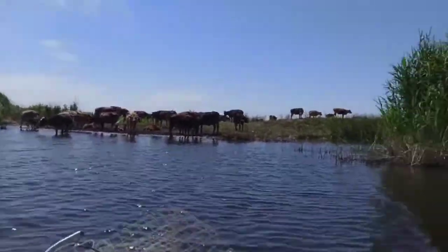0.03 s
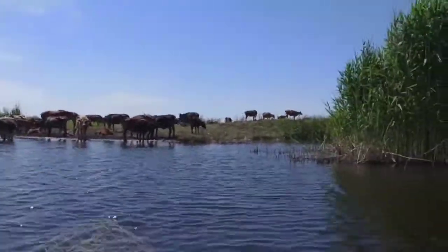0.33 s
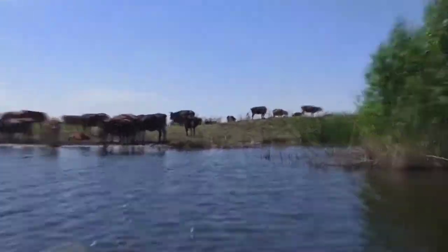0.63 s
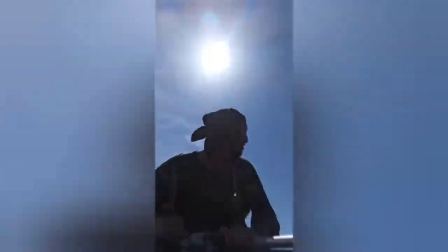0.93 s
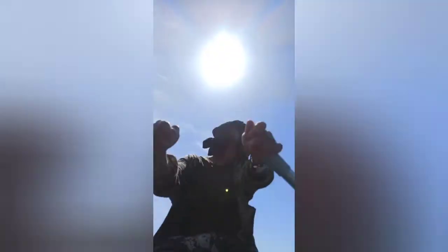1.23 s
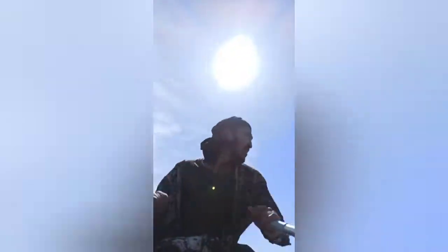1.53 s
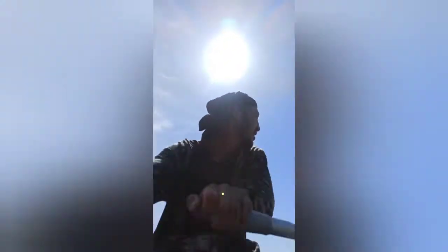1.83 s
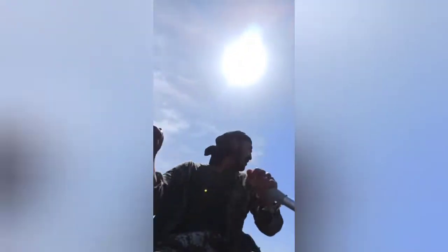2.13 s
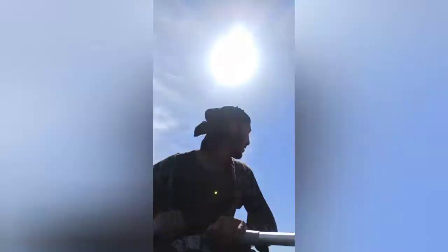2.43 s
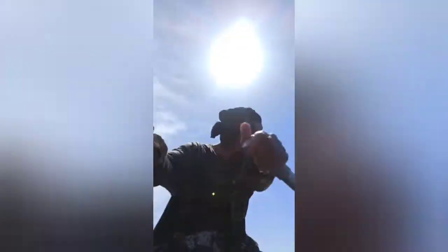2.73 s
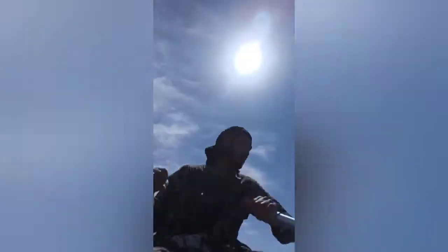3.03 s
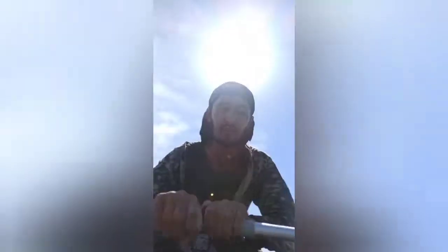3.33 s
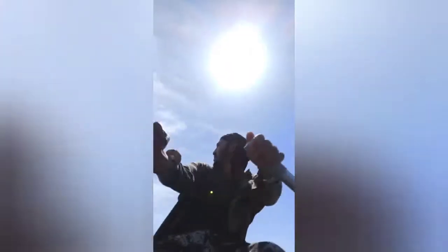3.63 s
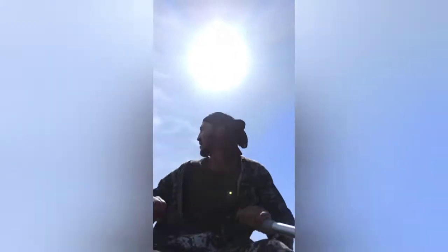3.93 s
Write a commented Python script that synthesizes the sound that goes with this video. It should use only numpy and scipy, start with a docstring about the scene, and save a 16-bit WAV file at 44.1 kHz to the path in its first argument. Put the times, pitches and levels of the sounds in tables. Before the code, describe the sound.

Oars row a small boat over open water, with wind thumping on the microphone. At first reeds and ripples hiss softly in the breeze, sinking away by 0.7 seconds. The close rowing fades up around 1 second, and an oarlock ticks and gives one raspy squeak at about 1.2. Quick strokes continue until 4 seconds, with splashing blades, plopping bubbles, swells of spray and low slaps against the hull.

```python
"""Oars pull a small boat over open water, the water sounds following thick and fast: blades splash, bubbles
ring, water slaps the hull and a wash of spray swells with each stroke. Once, an oar rubs in its lock with a
raspy squeak. The scene opens on reeds and ripples hissing in the breeze; they sink away before the close rowing
fades up. Throughout, wind eddies thump on the left and right ports of the microphone."""
import sys
import numpy as np
from scipy import signal
from scipy.fft import rfft, irfft
from scipy.io import wavfile
from scipy.ndimage import uniform_filter1d

SR = 44100
rng = np.random.default_rng(int(sys.argv[2]) if len(sys.argv) > 2 else 0)


def pcm_store(signal):
    """Save signal as 16-bit PCM."""
    levels = np.round(np.clip(np.atleast_2d(signal), -1, 1) * 32767)
    wavfile.write(sys.argv[1], SR, levels.astype(np.int16).T)


N = 176400
T = np.arange(N) / SR


def undb(db):
    """Decibels to gain."""
    return 10 ** (np.asarray(db) / 20)


def unit(x):
    """Scale to rms 1."""
    return x / np.sqrt(np.mean(x ** 2) + 1e-18)


def curve(table, column):
    """Automation lane: one column of a table, joined by straight lines in time."""
    rows = np.array(table)
    return np.interp(T, rows[:, 0], rows[:, column])


def pan(db):
    """Constant-power pan; db is left minus right."""
    gains = undb(np.array([np.atleast_1d(db), -np.atleast_1d(db)]) / 2)
    return gains / np.sqrt(np.mean(gains ** 2, axis=0))


def eq(x, points, tilt_db=0):
    """Shape a sound with an EQ curve and a tilt per octave; rms 1."""
    hz, db = np.array(points, float).T
    octave = np.log2(np.maximum(np.fft.rfftfreq(x.shape[-1], 1 / SR), 1))
    gain = undb(np.interp(octave, np.log2(hz), db) + tilt_db * octave)
    return unit(irfft(rfft(x) * gain, x.shape[-1]))


def butter(x, hz, kind, order=2):
    """Low-pass or high-pass filter."""
    return signal.sosfilt(signal.butter(order, hz, kind, fs=SR, output="sos"), x)


def wobble(rate):
    """Smooth random modulator that turns about rate times a second; rms 1."""
    hold = int(SR / rate)
    steps = np.repeat(rng.standard_normal(N // hold + 1), hold)
    return unit(uniform_filter1d(steps, hold)[:N])


def patter(per_s, scatter_db):
    """Stereo texture of tiny impacts of uneven size; rms 1."""
    hits = (rng.random((2, N)) < per_s / SR) * rng.standard_normal((2, N))
    return unit(hits * undb(scatter_db * np.minimum(rng.exponential(size=(2, N)), 4)))


def narrow_noise(width):
    """Noise that reaches both ports almost alike."""
    return rng.standard_normal(N) + width * rng.standard_normal((2, N))


def bubble(age, hz, cycles):
    """A bubble rings, rising in pitch as it dies away."""
    life = np.maximum(age, 0) * hz / cycles
    return np.sin(2 * np.pi * cycles * life * (1 + 0.029 * life)) * np.exp(-2 * life)


def bubbling(per_s, hz, octaves):
    """Bubbles of many sizes at random moments; rms 1."""
    out, age = np.zeros(N + SR // 30), np.arange(SR // 30) / SR
    for when, pitch, size in rng.random((int(per_s * N / SR), 3)):
        i = int(when * N)
        ring = bubble(age, hz * 2 ** (octaves * (pitch - .5)), cycles=5.5)
        out[i:i + len(age)] += undb(20 * size) * ring
    return unit(out[:N])


# Airy hiss of the reeds: f/Hz, level/dB
REEDS_EQ = [(100, 9.5), (400, 8), (800, 2.5), (1100, 1.5), (1700, 1), (3000, 1.5), (4500, 2.5),
            (5400, -3.5), (6600, 6.5), (7600, -1), (8400, -11), (9500, -57.5), (11000, -40), (12000, -13),
            (15500, -17.5), (20000, -33)]


def reeds():
    """Breeze hisses through the reeds while small ripples trickle."""
    hiss = eq(patter(12000, 1.2), REEDS_EQ) * undb(-45 + .5 * wobble(19)) * pan(-2.5)
    trickle = undb(-58.5) * bubbling(per_s=66, hz=1306, octaves=1.9)
    return hiss + trickle


# Fuller wind bed by the reeds: f/Hz, level/dB
REEDS_RUMBLE_EQ = [(20, -30.5), (45, -18.5), (80, 6), (130, 4.5), (210, -1.5), (330, -14.5), (450, -23),
                   (650, -37), (1500, -52), (16000, -86.5)]
# Wind bed at the oars: f/Hz, level/dB
OARS_RUMBLE_EQ = [(20, -30.5), (45, -39.5), (85, 7), (130, -0.5), (200, -7), (320, -12.5), (600, -51),
                  (1500, -63), (16000, -78.5)]


def wind_rumble(points, left_db, right_db):
    """Restless low turbulence, unrelated on the two ports."""
    flutter = undb(4 * np.array([wobble(30), wobble(22)]))
    turbulence = eq(rng.standard_normal((2, N)), points)
    return unit(turbulence * flutter) * undb([[left_db], [right_db]])


# Wind thumps on the microphone: t/s, length/s, level/dB, low-pass f/Hz, port (0 left, 1 right)
EDDIES = [(0.065, 0.012, -22, 190, 1), (0.114, 0.013, -22.5, 173, 1), (0.191, 0.006, -15.5, 240, 1),
          (0.205, 0.011, -16, 252, 1), (0.263, 0.045, -20, 219, 1), (0.306, 0.009, -19.5, 156.4, 1),
          (0.335, 0.086, -25, 164, 1), (0.361, 0.064, -20.5, 198, 1), (0.724, 0.01, -42, 208, 1),
          (0.888, 0.016, -40, 230, 0), (1.01, 0.022, -38, 240, 0), (1.217, 0.023, -15, 263, 0),
          (1.239, 0.029, -26, 700, 1), (1.245, 0.018, -19, 394, 0), (1.285, 0.063, -26, 176, 1),
          (1.401, 0.015, -14.5, 320, 0), (1.426, 0.011, -17, 220, 0), (1.481, 0.0064, -6.5, 288, 0),
          (1.501, 0.02, -17, 187, 0), (1.567, 0.01, -18.5, 270, 1), (1.606, 0.017, -15.5, 353, 0),
          (1.692, 0.041, -19.5, 228, 0), (1.814, 0.016, -19.5, 280, 1), (1.988, 0.0057, -21.5, 380, 1),
          (2.003, 0.018, -12, 264, 0), (2.065, 0.019, -19, 200, 0), (2.098, 0.0062, -7.5, 330, 0),
          (2.104, 0.018, -21, 282, 1), (2.145, 0.0085, -18, 290, 1), (2.171, 0.0093, -13, 358, 0),
          (2.184, 0.0042, -9, 417, 0), (2.208, 0.007, -15, 406, 0), (2.22, 0.015, -16.5, 447, 0),
          (2.236, 0.005, -14.5, 328, 0), (2.258, 0.026, -20.5, 297, 0), (2.288, 0.0083, -18, 300, 1),
          (2.289, 0.006, -19.5, 400, 0), (2.302, 0.007, -16.5, 239, 0), (2.312, 0.0047, -19, 416, 0),
          (2.392, 0.0089, -15.5, 280, 0), (2.451, 0.04, -24.5, 290, 0), (2.483, 0.016, -18.5, 242, 0),
          (2.518, 0.012, -11, 362, 0), (2.584, 0.012, -12.5, 165, 0), (2.612, 0.0061, -13, 232, 0),
          (2.633, 0.0093, -15.5, 260, 1), (2.68, 0.021, -13, 262, 0), (2.702, 0.007, -11.5, 198, 0),
          (2.697, 0.012, -16.5, 214, 1), (2.735, 0.011, -15, 226, 0), (2.92, 0.046, -20, 176, 0),
          (3.055, 0.017, -17, 280, 0), (3.063, 0.0059, -13.5, 280, 0), (3.106, 0.005, -12.5, 308, 0),
          (3.118, 0.007, -10.5, 218, 0), (3.141, 0.0058, -11.5, 455, 0), (3.158, 0.0067, -17, 240, 1),
          (3.221, 0.011, -15.5, 426, 0), (3.237, 0.0074, -9.5, 414, 0), (3.252, 0.014, -13, 236, 0),
          (3.326, 0.0051, -10.5, 158, 0), (3.333, 0.012, -19, 180, 1), (3.387, 0.0078, -15, 177, 0),
          (3.426, 0.021, -15.5, 242, 0), (3.428, 0.0069, -9, 292, 1), (3.467, 0.0097, -15, 255, 0),
          (3.481, 0.016, -20, 214, 1), (3.499, 0.0077, -16.5, 225, 0), (3.557, 0.015, -13, 258, 0),
          (3.655, 0.0068, -9, 350, 0), (3.747, 0.017, -23, 170, 0), (3.836, 0.0042, -8, 235, 0),
          (3.859, 0.0069, -13, 190, 0), (3.922, 0.021, -17, 208, 0), (3.995, 0.014, -16, 211, 0)]


def wind_thumps():
    """Each eddy hits one port with a pressure kick inside a short burst of turbulence."""
    count, lead_s = 8192, 0.00304
    out = np.zeros((2, N + count))
    t = (np.arange(count) - count // 2) / SR + lead_s
    kick = unit(np.exp(-np.abs(t) * SR))
    for at, length, db, hz, port in EDDIES:
        burst = unit(rng.standard_normal(count) * np.exp(-np.abs(t / (0.64 * length)) ** 3.4))
        punch = 0.65 * min(0.012 / length, 3)  # shorter eddies kick harder
        dull = butter(burst + punch * kick, hz, "low")
        thump = butter(butter(dull, 1.83 * hz, "low"), 79.4, "high", order=4)
        i = int(at * SR)
        out[port, i:i + count] += thump * undb(db + 2.5) * np.sqrt(length * SR / np.sum(thump ** 2))
    return out[:, count // 2:count // 2 + N]


# Fizzy runs of bubbles: centre t/s, half-length/s, level/dB, f/Hz
CLOUDS = [(0.127, 0.026, -45.5, 1750), (1.824, .012, -37, 1590), (1.96, .018, -32.5, 1400),
          (2.684, .012, -33, 1900), (2.867, 0.016, -38.5, 2210), (3.586, .012, -36.5, 1430)]


def bubble_clouds(per_s=600):
    """Water laps or closes over a blade and frees a short run of ringing bubbles."""
    out, age = np.zeros((2, N + SR)), np.arange(SR // 25) / SR
    for at, half_length, db, hz in CLOUDS:
        count = int(per_s * half_length)
        for k, (when, pitch, size, side) in enumerate(rng.random((count, 4))):
            i = int((at + half_length * (2 * (k + when) / count - 1)) * SR)
            ring = bubble(age, hz * 2 ** (pitch - .5), cycles=12.2)
            out[:, i:i + len(age)] += ring * undb(db + 3.6 * size) * pan(10 * (side - .5))
    return out[:, :N]


# Splashes off the blades: t/s, length/s, level/dB, tilt/(dB per octave), pan/dB
BLADE_SPLASHES = [(0.132, 0.026, -46.5, -4, -7), (1.139, 0.01, -32.5, -0.5, 6), (1.192, 0.013, -31, -9, 1),
                  (1.493, 0.013, -37.5, -6, 6), (1.827, 0.0093, -36.5, -5, 4), (1.887, 0.0071, -28, 3, 22),
                  (1.959, 0.019, -29.5, -9, 5), (2.105, 0.004, -34, -8.5, -7), (2.635, 0.0053, -29, -2, 5),
                  (2.677, 0.0037, -21.5, -10, 4), (2.701, 0.0047, -33.5, 0, 1), (2.755, 0.013, -33, -7, -2),
                  (3.472, 0.0023, -26, -1, 3), (3.538, .008, -28.5, -10, 2), (3.583, 0.008, -26, -10, -9),
                  (3.684, 0.0044, -39, -2, -1), (3.725, 0.006, -36.5, -6, 2), (3.914, 0.007, -31, -9.5, 3)]
# Bright spatter of a splash: f/Hz, level/dB
SPLASH_EQ = [(200, -70.5), (700, -9), (1500, -3), (4300, 4), (5400, -4.5), (7000, 9), (8800, -36.5),
             (15000, -34), (20000, -44)]


def splashes():
    """Each splash is a shower of drops that starts sharply and thins out."""
    out, showers, count = np.zeros((2, N)), patter(6000, 2.5), 8192
    lead, attack, decay = 0.95, 0.41, 2  # in splash lengths
    for at, length, db, tilt_db, pan_db in BLADE_SPLASHES:
        start = max(int(at * SR) - count // 2, 0)
        span = slice(start, start + count)
        age = (T[span] - at) / length + lead
        envelope = np.clip(age / attack, 0, 1) * np.exp(-np.maximum(age - attack, 0) / decay)
        out[:, span] += eq(showers[:, span], SPLASH_EQ, tilt_db) * envelope * undb(db) * pan(pan_db)
    return out


def drops(per_splash=7, centre_hz=1660, scatter_s=0.011):
    """A few drops plink back into the water with each splash."""
    out, age = np.zeros((2, N + SR)), np.arange(SR // 20) / SR
    for at, _, db, _, pan_db in BLADE_SPLASHES:
        for when, pitch, size, side in rng.random((per_splash, 4)):
            i = int((at + when * scatter_s) * SR)
            ring = bubble(age, centre_hz * 2 ** (1.2 * (pitch - .5)), cycles=12.3)
            out[:, i:i + len(age)] += ring * undb(db - 9.5 + 3.1 * size) * pan(pan_db + 10 * (side - .5))
    return out[:, :N]


# Spot plops of water: t/s, f/Hz, level/dB
WATER_PLOPS = [(.225, 600, -38), (.455, 546, -40.5), (0.634, 980, -51), (1.908, 1150, -26.5),
               (2.838, 695, -26), (2.858, 2150, -32), (2.743, 2350, -31), (2.866, 299, -20.5),
               (3.766, 1070, -27)]


def plops():
    """Lone bubbles ring out in the centre."""
    return sum(undb(db) * bubble(T - at, hz, cycles=11) for at, hz, db in WATER_PLOPS)


# Swell of the strokes: t/s, churn level/dB, spray level/dB, spray pan/dB
STROKES = [(1.27, -41, -51.5, -20), (1.31, -42, -53.5, -9), (1.44, -43.5, -49.5, 9), (1.52, -41, -52, -3.5),
           (1.66, -41, -50, 4.5), (1.99, -38.5, -45, 4), (2.01, -43, -52, 7), (2.33, -45, -57.5, -6.5),
           (2.65, -38, -45.5, 5.5), (2.91, -45, -51.5, 6.5), (3.26, -43, -56, -4), (3.36, -44, -45.5, 3.5),
           (3.54, -40.5, -52, 4), (3.59, -40, -52.5, -7), (3.63, -45, -57.5, 1), (3.75, -42.5, -50, 4.5),
           (3.96, -40, -53.5, 7), (4.0, -40, -49, 1)]
# Midrange body of churned water: f/Hz, level/dB
CHURN_EQ = [(300, 1), (900, 11.5), (1300, 5.5), (2000, 5), (3000, -2), (4500, -6), (5400, -6.5),
            (8000, -69), (16000, -73)]
# Sizzle of fine spray: f/Hz, level/dB
SPRAY_EQ = [(1500, -15), (3000, 2), (4500, 6), (5100, -10.5), (5900, 0), (6500, 8), (7500, 4.5), (8300, -5),
            (9300, -53), (11000, -38), (12000, -10), (15500, -10.5), (20000, -23.5)]


def wash():
    """Churned water and fine spray swell with each stroke."""
    pan_db = np.where(T < STROKES[0][0], 6, curve(STROKES, 3))
    churn = eq(patter(5000, 2.05), CHURN_EQ) * undb(curve(STROKES, 1) + 2 + 1.05 * wobble(45))
    spray = eq(patter(9000, 1.7), SPRAY_EQ) * undb(curve(STROKES, 2) + 6 + 2 * wobble(45))
    return churn * pan(0.95 * pan_db - 5) + spray * pan(pan_db)


# Dark gurgle along the hull: f/Hz, level/dB
GURGLE_EQ = [(30, -29.5), (90, 0.5), (190, 2), (320, -6.5), (600, -9), (850, -15.5), (1300, -42),
             (3000, -43), (16000, -99)]


def gurgle():
    """Water gurgles along the hull, riding the churn of the oars, over a steady bed of bubbles."""
    churn_db = curve(STROKES, 1)
    stir = undb(0.54 * (churn_db - churn_db.mean()) + 3.5 * wobble(35))
    body = unit(eq(narrow_noise(0.4), GURGLE_EQ) * stir)
    return undb(-28.5) * body + undb(-49) * bubbling(per_s=93, hz=779, octaves=2.5)


# Slaps on the hull: t/s, level/dB
HULL_SLAPS = [(1.143, -21.5), (1.242, -20.5), (1.433, -24.5), (1.61, -19), (1.681, -26), (1.831, -22.5),
              (1.887, -20), (1.961, -20), (2.104, -24.5), (2.309, -25), (2.4, -25.5), (2.534, -24.5),
              (2.612, -24), (2.735, -22), (2.792, -19.5), (2.895, -27), (3.056, -28), (3.152, -29),
              (3.207, -25), (3.426, -28), (3.494, -24.5), (3.591, -20.5), (3.666, -29.5), (3.992, -22)]
# Hollow thud of a slap: f/Hz, level/dB
SLAP_EQ = [(25, -43), (60, -17.5), (170, 13.5), (350, -0.5), (650, 5), (900, -3), (1300, -18), (2500, -18),
           (6000, -54), (16000, -80.5)]


def hull_slaps(attack_s=0.012, release_s=0.022):
    """Water hits the hull in soft-edged, low thuds."""
    force = np.zeros(N)
    for at, db in HULL_SLAPS:
        width = np.where(T < at, attack_s, release_s)
        force += undb(db - 3.5) * np.exp(-((T - at) / width) ** 2)
    return force * eq(narrow_noise(0.32), SLAP_EQ)


# Ticks of the oarlock: t/s, level/dB
LOCK_TICKS = [(1.167, -30), (1.182, -31), (1.247, -43), (1.883, -39)]
# Crisp click of a tick: f/Hz, level/dB
TICK_EQ = [(500, -22), (2000, -5), (4500, 0), (7000, 0), (8500, -5), (10500, -32), (12500, -12),
           (15000, -3), (20000, -23)]


def oarlock_ticks(decay_s=0.0044):
    """The oar knocks against its lock in short, bright contacts."""
    force = sum(undb(db) * (T >= at) * np.exp(-np.abs(T - at) / decay_s) for at, db in LOCK_TICKS)
    return force * eq(rng.standard_normal((2, N)), TICK_EQ) * pan(-4)


def stick_slip(track, partials, jitter, ramp_s=0.004):
    """A rubbing contact sings on an unsteady pitch, each harmonic fluttering in level."""
    hz = curve(track, 1) * (1 + jitter * wobble(1100))
    phase = 2 * np.pi * np.cumsum(hz) / SR
    gate = np.clip(np.minimum(T - track[0][0], track[-1][0] - T) / ramp_s, 0, 1)
    tone = sum(undb(db + 2 * wobble(250)) * np.sin(k * phase) for k, db in partials)
    return gate * undb(curve(track, 2)) * tone


# The squeak, its thinner tail and a weaker chirp: t/s, f/Hz, level/dB
SQUEAK_LINE = [(1.179, 2147, -36), (1.186, 2167, -26), (1.195, 2184, -22), (1.203, 2165, -26),
               (1.212, 2090, -42)]
TAIL_LINE = [(1.200, 2145, -39), (1.207, 2106, -22.5), (1.213, 2070, -25.5), (1.222, 2085, -31),
             (1.228, 2070, -48)]
CHIRP_LINE = [(1.232, 2970, -48), (1.240, 2980, -37), (1.249, 2960, -37.5), (1.264, 2985, -55)]
# Their timbres: harmonic number, level/dB
SQUEAK_TIMBRE = [(1, -11), (2, 2), (3, -4), (6, -20.5), (7, -23)]
TAIL_TIMBRE = [(1, -10), (2, -14), (3, -1.5), (7, -16)]
CHIRP_TIMBRE = [(1, -2), (2, -2)]
# Dry grit under the squeak: f/Hz, level/dB
RASP_EQ = [(1000, -27), (2300, 4), (3500, -14), (4600, -2), (5500, -28), (7300, 0), (9000, -24),
           (15000, -16), (20000, -35)]


def oarlock_squeak():
    """The oar rubs in its dry lock: a raspy squeak drops to a thinner tone, then chirps again."""
    squeak = stick_slip(SQUEAK_LINE, SQUEAK_TIMBRE, jitter=0.007)
    squeak += stick_slip(TAIL_LINE, TAIL_TIMBRE, jitter=0.007)
    envelope = np.sqrt(np.abs(uniform_filter1d(squeak ** 2, size=1200)))
    rasp = undb(-10.5) * envelope * eq(patter(2300, 1.8), RASP_EQ)
    chirp = stick_slip(CHIRP_LINE, CHIRP_TIMBRE, jitter=0.014)
    return (squeak + rasp + chirp) * pan(5)


# Groan of the turning oar: t/s, f/Hz, level/dB
GROAN_LINE = [(1.208, 612, -23), (1.219, 598, -33), (1.243, 585, -27.5), (1.252, 580, -40),
              (1.266, 595, -64)]
# Its round timbre: harmonic number, level/dB
GROAN_TIMBRE = [(1, 6), (2, -12), (3, -22)]


def oarlock_groan():
    """The oar sticks and slips on a lower note as it turns in its lock."""
    return stick_slip(GROAN_LINE, GROAN_TIMBRE, jitter=0.0082) * pan(-6)


def scene():
    """The reed bed sinks to a trace, the rowing bed fades up; spot effects play outside the fades."""
    turn_s, fade_out_s, fade_in_s = 0.775, 0.51, 0.47
    fade_out = np.clip((turn_s - T) / fade_out_s, 0, 1) ** 0.95 + 0.04
    fade_in = np.clip((T - turn_s) / fade_in_s, 0, 1) ** 0.98
    lull = undb(-8.5 * np.clip((T - 0.46) / 0.11, 0, 1))  # the first gust drops away
    reed_bed = reeds() + lull * wind_rumble(REEDS_RUMBLE_EQ, left_db=-33.5, right_db=-21.5)
    rowing_bed = wash() + gurgle() + hull_slaps()
    rowing_bed += wind_rumble(OARS_RUMBLE_EQ, left_db=-29.5, right_db=-37.5)
    spots = wind_thumps() + bubble_clouds() + splashes() + drops() + plops()
    oarlock = oarlock_ticks() + oarlock_squeak() + oarlock_groan()
    return fade_out * reed_bed + fade_in * rowing_bed + spots + oarlock


def record(dry, ceiling=1.05, top_hz=15800):
    """The microphone soft-clips the hardest gusts; a steep low-pass cuts the top."""
    rounded = dry / (1 + (dry / ceiling) ** 4) ** 0.25
    return signal.sosfilt(signal.ellip(10, .2, 80, top_hz, fs=SR, output="sos"), rounded)


dry = scene()
out = record(dry)
pcm_store(out)
```